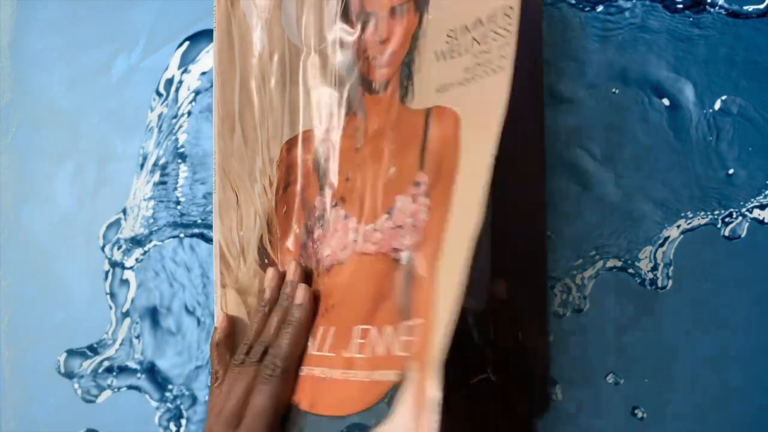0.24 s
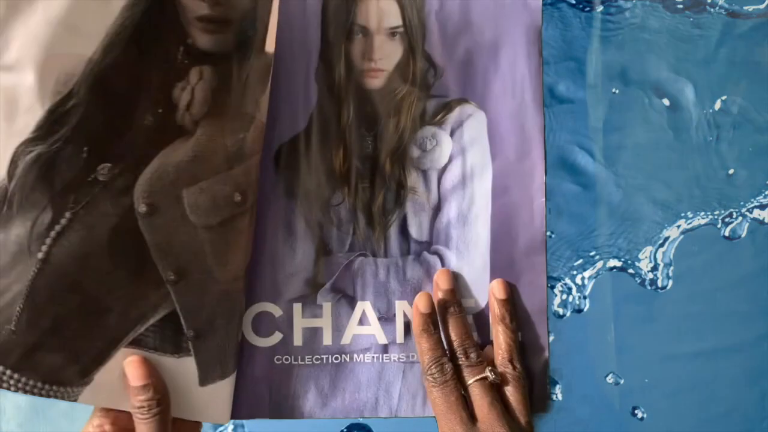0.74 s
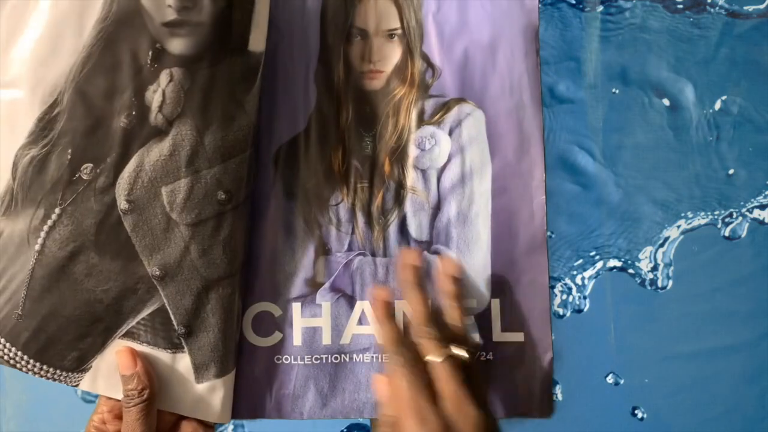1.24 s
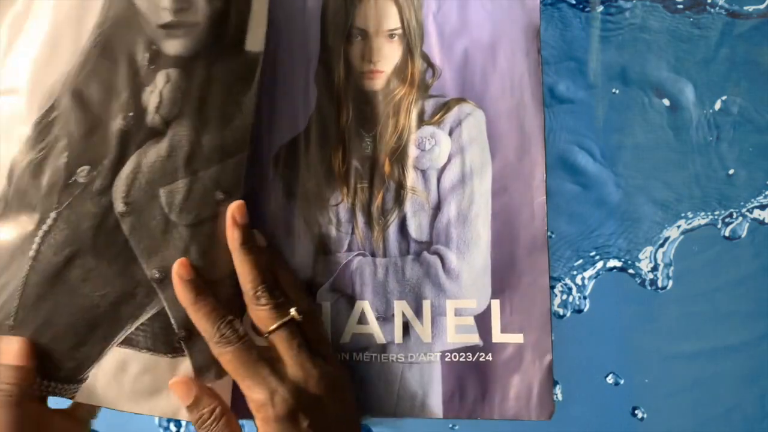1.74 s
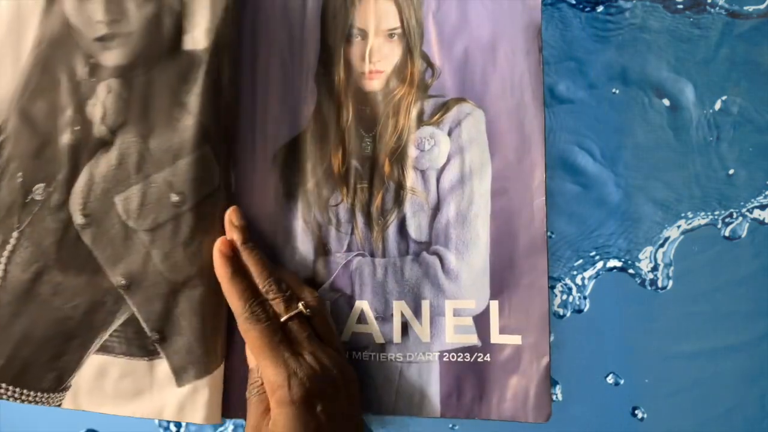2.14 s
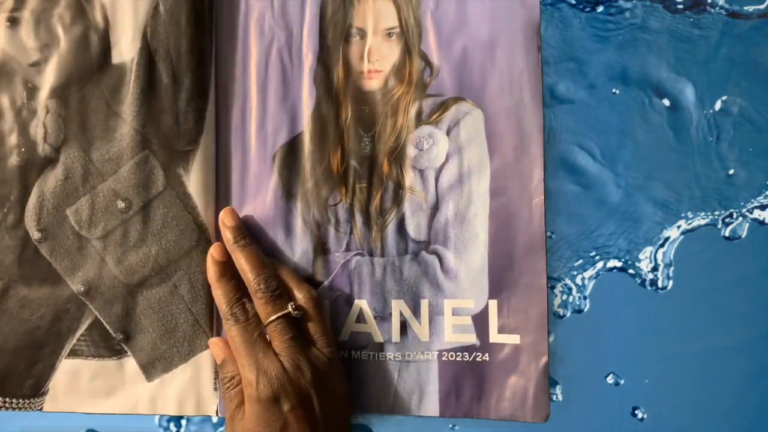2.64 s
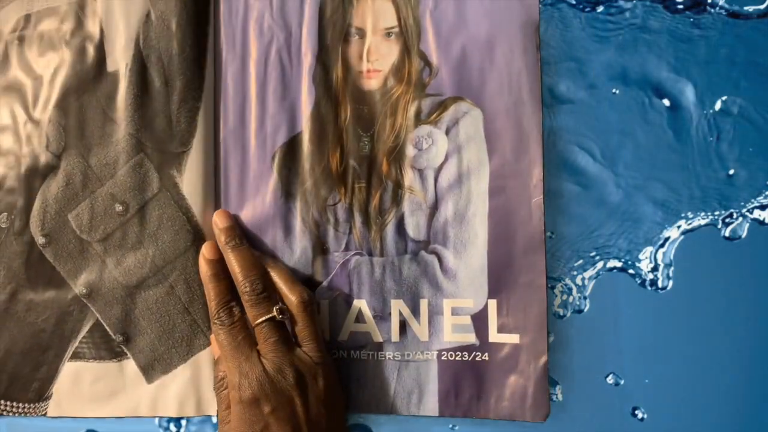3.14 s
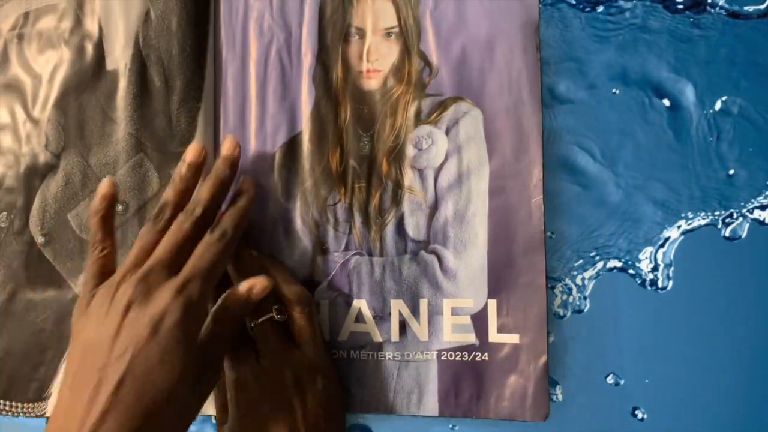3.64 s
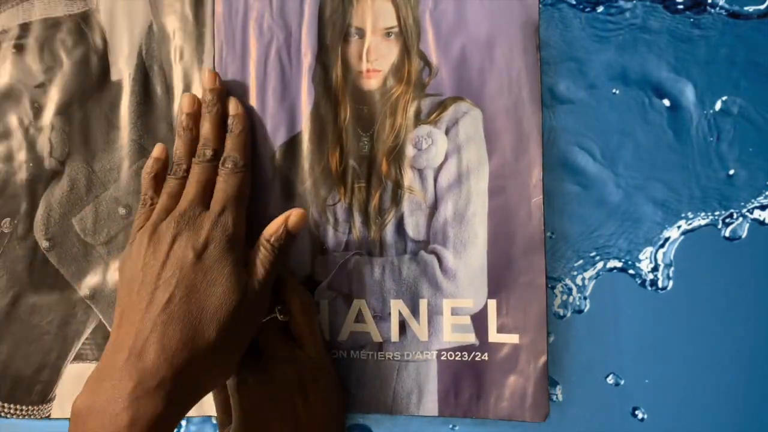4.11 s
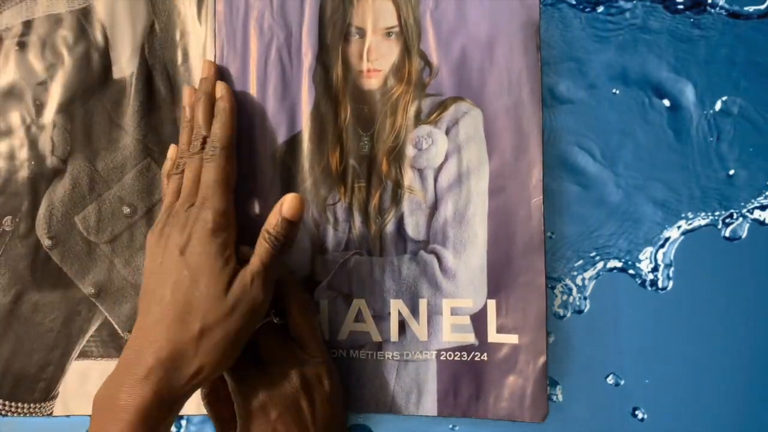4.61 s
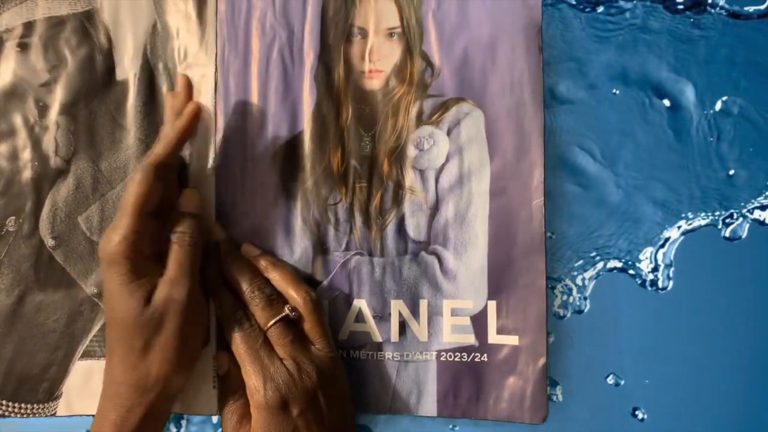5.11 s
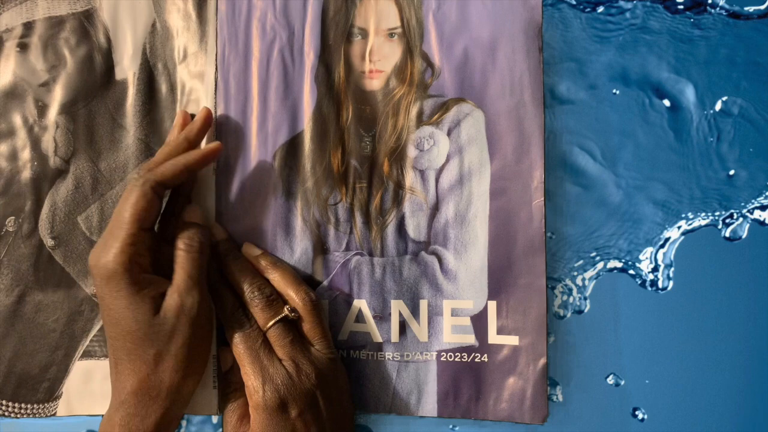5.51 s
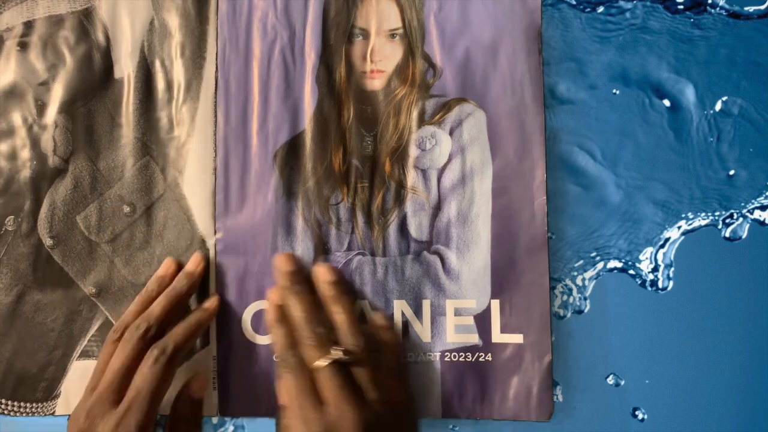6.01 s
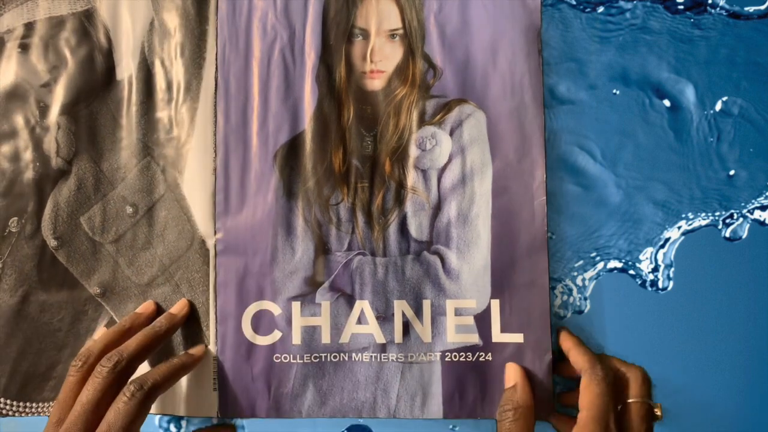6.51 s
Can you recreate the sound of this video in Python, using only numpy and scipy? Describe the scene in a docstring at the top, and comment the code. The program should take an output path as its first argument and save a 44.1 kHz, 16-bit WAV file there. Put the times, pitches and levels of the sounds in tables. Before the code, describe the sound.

Hands turn and flatten stiff glossy paper on a desk, heard very close in stereo. The opening has several bright snaps, then separated pops and fine sticky ticks, with faint brushing between them. Crackling bunches up past the middle, and a longer skin-on-paper hiss swells near the end with a few crinkles. Short room reflections surround it; a quiet bass hum throbs steadily underneath.

```python
"""A glossy magazine lies on a desk close to a phone. The cover opens with a bright snap; then hands press
and stroke the pages. Through the scene the stiff paper buckles, as noise-driven damped modes, with short snaps
and tiny ticks. Between them slides and brushes hiss over the gloss as shaped friction noise, the loudest
of them near the end. A small room answers with echoes and a decaying tail. From start to end appliances
behind the wall hum as a sum of tones that beat against each other, over a soft noise of air."""
import sys
import numpy as np
from scipy import signal
from scipy.fft import rfft, irfft, next_fast_len
from scipy.io import wavfile
from scipy.ndimage import uniform_filter1d, map_coordinates

SR = 44100
rng = np.random.default_rng(int(sys.argv[2]) if len(sys.argv) > 2 else 0)


def pcm_store(signal):
    """Save signal as 16-bit PCM."""
    levels = np.round(np.clip(np.atleast_2d(signal), -1, 1) * 32767)
    wavfile.write(sys.argv[1], SR, levels.astype(np.int16).T)


N = 298116  # length in samples

# Buckles of the sheet: t/s, approximate peak of the patch's ring level/dB, pitch f/Hz,
# crispness level/dB, weight level/dB, length/ms, left minus right level/dB
BUCKLES = [(0.003, -23, 1460, -1.5, -12.5, 4.2, -4), (0.077, -24.5, 955, -24, -16, 3.4, -2.5),
           (0.279, -25, 1340, -16.5, -8.5, 5.4, -2.5), (0.77, -22, 926, -25, -18, 2.55, 0),
           (0.782, -51, 1090, -32, -33, 2.3, 2), (1.063, -54, 2700, -15, -18, 3.3, -3),
           (1.111, -53, 1210, -25, -27, 7.5, -3), (1.213, -26, 1255, -36, -9, 3.5, -2),
           (1.54, -20, 1150, -11.5, -18.5, 5.4, -1), (1.636, -49.5, 960, -3, -5, 5.3, 1.5),
           (1.687, -41, 720, -15, -5.5, 7.2, -2), (1.805, -36, 640, -16, 1, 5.7, -4.5),
           (2.084, -18.5, 1280, -4, -28, 2.6, 0), (2.261, -37.5, 705, -22, 0.5, 8.4, -3.5),
           (2.28, -49.5, 780, -26, 8.5, 5.6, -2.5), (2.319, -39, 857, -42, -10, 8.7, -2),
           (2.627, -46, 755, -40, -3, 4.1, 1), (2.987, -50, 1260, -4, -28, 5.6, -5),
           (3.041, -35.5, 1070, -32, -17.5, 5.1, .5), (3.1, -35, 880, -22, -13, 7.5, -3),
           (3.137, -42.5, 1020, -24, 0.5, 8.7, -1.5), (3.647, -47.5, 1130, -30, -40, 12, 1),
           (4.06, -40, 750, -32, 5.5, 6, -3), (4.114, -28, 1500, 0.5, -14.5, 4.1, -1),
           (4.126, -32, 2400, -26, -33, 3.8, -7), (4.178, -25.5, 1350, -8.5, -19.5, 9.3, -6),
           (4.183, -23.5, 1200, -8, -3, 3.6, -3), (4.19, -28, 2160, -17, -11, 4.5, 4),
           (4.376, -47.5, 1550, -2, -12, 2.5, 0), (4.883, -18.5, 1530, -43, -17, 4.5, -3.5),
           (4.895, -23, 736, -5, -10.5, 3.9, 1), (4.931, -29, 1300, -16, -14.5, 4.2, -1.5),
           (5.356, -59, 1200, -23, -10, 5, -4), (5.958, -48.5, 1060, -10, 1, 8.1, -5),
           (6.139, -54.5, 2730, 11, -4.5, 9.6, -2), (6.177, -32, 1760, -16.5, -11, 10.3, -4),
           (6.187, -33, 860, -7, -21, 7.6, 2), (6.234, -30, 1350, -2.5, -10, 6.8, -2.5),
           (6.744, -43.5, 860, -29, -11, 4.4, -4)]
# Modes shaken along with the patch, two of crack and edge, then body and thump:
# centre f/Hz, width f/Hz, run of slips longer by this factor, level/dB before crispness or weight
SHEET_MODES = [(8100, 25000, 0.51, -15), (3890, 5060, 1.33, -0.64), (639, 580, 0.99, -1.7),
               (231, 700, 4.3, -8.5)]
JOLT, SOFTENS_DB = 2.32, 2  # jolt relative to the slips; raising the weight by this shrinks the jolt
PATCH_WIDTH_HZ, PATCH_WIDENS = 1440, 0.73  # ring width at 1.2 kHz; it grows as this power of the pitch
LEAD_IN = 400  # samples of soft onset before the jolt


def snaps():
    """Buckling instability: the bent patch rings at its own pitch and shakes the sheet and the pile below."""
    out = np.zeros((2, N + SR))
    for s, db, hz, crisp_db, weight_db, ms, pan_db in BUCKLES:
        noise = rng.standard_normal((5, SR // 10))
        jolt = JOLT * max(1 - amp(weight_db + SOFTENS_DB), 0)  # a heavy buckle lets go softly
        patch_width_hz = PATCH_WIDTH_HZ * (hz / 1200) ** PATCH_WIDENS
        sound = slips(noise[0], ms, hz, patch_width_hz, jolt)
        for row, (centre_hz, width_hz, longer, level_db) in zip(noise[1:], SHEET_MODES):
            # crack and edge grow with crispness, body and thump with weight
            shake_db = level_db + (crisp_db if centre_hz > 1000 else weight_db)
            sound = sound + amp(shake_db) * slips(row, longer * ms, centre_hz, width_hz, jolt)
        start = round((s + .0015) * SR)  # the jolt comes just after the soft onset begins
        pan = amp([[pan_db / 2], [-pan_db / 2]])
        out[:, start:][:, :len(sound)] += amp(db) * sound * pan
    return out[:, LEAD_IN:LEAD_IN + N]


def slips(noise, ms, centre_hz, width_hz, jolt):
    """Stick-slip excitation of a damped mode: soft onset, one jolt, slips that fall 20 dB in ms (at least 1)."""
    t = (np.arange(len(noise)) - LEAD_IN) / SR
    onset = amp(-13.5 + 20 * t / 0.0097)
    decay = amp(-20 * t / (max(ms, 1) / 1000))
    force = noise * np.where(t < 0, onset, decay)
    force[LEAD_IN:LEAD_IN + 4] += jolt * np.sign(noise[0])
    mode = resonance(centre_hz, width_hz)
    # the soft sheet rings one broad mode and passes little above it
    ring = filtered(force, lambda f: mode(f) ** 3 / (1 + 1j * f / (3.32 * centre_hz)) ** 4)
    ring_s = ms / 1000 + 1 / width_hz
    power = np.sum(ring ** 2) / (SR * ring_s)
    return ring / np.sqrt(power) * 0.44  # largest swing near 1


# A fingertip or the next page unsticks from the gloss: t/s, peak level/dB, pitch f/Hz
UNSTICKINGS = [(.0035, -23, 7470), (1.0035, -55, 13000), (1.065, -52, 7550), (1.1119, -54, 6980),
               (1.3986, -56, 6430), (1.67, -41, 7410), (1.9921, -56, 6580), (2.221, -40, 12560),
               (2.2408, -38.5, 7620), (2.2588, -45, 7160), (2.289, -51.5, 8550), (2.36, -54.5, 6660),
               (2.4933, -52, 12500), (2.5638, -53.5, 5930), (2.7958, -50, 7420), (2.825, -64, 11570),
               (2.889, -50, 13100), (3.033, -40.5, 7190), (3.055, -38.5, 7400), (3.119, -32, 6260),
               (3.1274, -30, 5960), (3.3878, -57.5, 13300), (4.1596, -45, 5100), (4.5221, -69, 12500),
               (5.105, -56.5, 6450), (5.1901, -53.5, 11900), (6.4872, -45.5, 12200)]
RISE_S, TICK_S = .0017, .0035  # time constant of the swell; time in which the decay falls 20 dB


def ticks():
    """Adhesive release: millisecond bursts through a broad treble resonance swell quickly and die."""
    out, t = np.zeros(N + SR), np.arange(SR // 50) / SR
    envelope = (1 - np.exp(-t / RISE_S)) * amp(-20 * t / TICK_S)
    for s, db, hz in UNSTICKINGS:
        burst = rng.standard_normal(len(t)) * envelope
        ring = filtered(burst, lambda f: resonance(hz, 1.8 * hz)(f) ** 2)
        out[round(s * SR):][:len(t)] += amp(db) * peak_one(ring)
    return np.array([out[:N], out[:N]])


# Spectral shapes of skin hiss, page rustle and dull drag: f/Hz, relative level/dB per Hz
SKIN_SHAPE = [(4000, -26.5), (7000, -3.5), (10000, -0.5), (13000, 1), (15700, -1)]
PAGE_SHAPE = [(2500, -42), (4000, 0.5), (5500, 0), (7000, -1), (9000, -10.5), (12000, -31)]
DRAG_SHAPE = [(600, -36.5), (1200, -12), (1700, -4.5), (2400, -10), (3800, -11), (6000, -28)]
PAGE_SHARE, PAGE_DB = .55, -1.5  # the rustle follows the hiss by this share, the drag by the rest


def stroke():
    """Sliding friction: skin on gloss gives a fine hiss, the page's rustle and a duller drag; pressure trembles."""
    skin_db, drag_db = contact()
    page_db = PAGE_DB + PAGE_SHARE * skin_db + (1 - PAGE_SHARE) * drag_db
    tremble = wobble(30)
    skin = amp(skin_db + 1.3 * tremble) * rush(SKIN_SHAPE, grain_db=1.0, patchy_db=-1.0)
    page = amp(page_db + 1.4 * tremble) * rush(PAGE_SHAPE, grain_db=1.5, patchy_db=1.5)
    drag = amp(drag_db + .6 * wobble(24)) * rush(DRAG_SHAPE, grain_db=2.5, patchy_db=1.6)
    return skin + page + drag


# Long slides of a hand, one curve each: t/s, skin hiss level/dB, drag level/dB
SLIDE_CURVES = [
    [(.3, -91, -89), (.45, -83.5, -78), (.56, -67, -69), (.68, -65.5, -70.5)],
    [(1.42, -70.5, -71.5), (1.58, -56.5, -68), (1.65, -54.5, -66), (1.73, -47.5, -58.5), (1.86, -63, -64),
     (1.92, -46.5, -55.5), (2.05, -69.5, -70), (2.16, -73.5, -63), (2.28, -63.5, -65.5), (2.36, -70.5, -78)],
    [(2.95, -79, -73), (3.03, -61.5, -68.5), (3.12, -47, -52), (3.17, -74, -75.5)],
    [(3.66, -56.5, -72.5), (3.71, -57.5, -73.5), (3.87, -62.5, -74), (4.07, -62, -64), (4.17, -56.5, -75)],
    [(4.62, -79.5, -64), (4.67, -61, -65), (4.72, -67, -64), (4.8, -61.5, -58), (4.83, -63, -77)],
    [(5.48, -56.5, -59.5), (5.59, -48.5, -59.5), (5.64, -50, -59), (5.69, -48.5, -55.5), (5.8, -55.5, -66),
     (5.97, -47.5, -63), (6.08, -43, -58), (6.19, -40, -67), (6.25, -50, -67), (6.36, -50, -64),
     (6.42, -61.5, -76.5)],
]
# Brief brushes of a finger: start t/s, length t/s, skin hiss level/dB, drag level/dB
FINGER_BRUSHES = [(0, 0.061, -62, -55), (1.018, 0.014, -71, -100), (1.107, 0.021, -73.5, -73),
                  (2.566, 0.015, -75, -73.5), (2.8, 0.0072, -89, -74.5), (2.9, 0.0043, -94, -88),
                  (4.354, 0.058, -73, -70), (4.879, 0.071, -71, -67.5), (5.194, 0.02, -70.5, -72),
                  (5.356, 0.0067, -73.5, -69), (6.481, 0.041, -60.5, -89), (6.583, 0.17, -76, -91)]
LAND_S, LIFT_S, FADE_DB = 0.036, 0.054, 25.5  # a contact fades by FADE_DB per LAND_S before, per LIFT_S after
REST_HISS_DB, REST_DRAG_DB = -83, -84.5  # hands lying still


def contact():
    """Contact envelopes: hiss and drag levels in dB as each slide or brush lands, runs its course and lifts."""
    t = np.arange(N) / SR
    gain = amp([[REST_HISS_DB], [REST_DRAG_DB]]) * np.ones(N)
    brushes = [[(s, *db), (s + length, *db)] for s, length, *db in FINGER_BRUSHES]
    for rows in SLIDE_CURVES + brushes:
        s, *levels = np.transpose(rows)
        before, after = np.maximum(s[0] - t, 0), np.maximum(t - s[-1], 0)
        away_db = FADE_DB * (before / LAND_S + after / LIFT_S)
        gain = gain + amp([np.interp(t, s, db) - away_db for db in levels])
    return 20 * np.log10(gain)


# The flat hand's scrape over time: t/s, level/dB
PALM_CURVE = [(0.0, -66), (0.7, -71), (0.88, -84.5), (1.34, -74), (1.75, -60.5), (2.2, -64), (2.33, -72.5),
              (3.07, -75), (3.3, -89.5), (3.62, -84), (3.66, -63), (3.8, -69.5), (4.0, -69), (4.2, -65.5),
              (4.59, -75.5), (4.89, -71), (5.361, -76.5), (5.67, -62.5), (5.93, -68), (6.3, -64.5),
              (6.48, -79.5), (6.76, -69.5)]
# Spectral shape of the scrape: f/Hz, relative level/dB per Hz
SCRAPE_SHAPE = [(350, -38), (650, -11.5), (950, -6.5), (1250, -4.5), (1550, -11), (2300, -28.5)]


def palm():
    """Broad-contact friction: the flat hand moving on the pile makes a warm narrow scrape."""
    s, db = np.transpose(PALM_CURVE)
    level_db = np.interp(np.arange(N) / SR, s, db) + 0.46 * wobble(15)
    return amp(level_db) * rush(SCRAPE_SHAPE, grain_db=2.5, patchy_db=3.5)


# Echoes off the desk and near surfaces: delay t/s, level/dB
REFLECTIONS = [(.0042, -17), (0.0108, -15.5), (.018, -36.5)]


def early_echoes(x):
    """Specular reflection: each near surface returns a delayed, weaker copy."""
    return sum(amp(db) * np.pad(x, ((0, 0), (round(s * SR), 0)))[:, :N] for s, db in REFLECTIONS)


# Reverberation time: f/Hz, time to fall 60 dB t/s
DECAY_TIMES = [(200, 0.43), (600, 0.13), (1500, 0.19), (4000, 0.22), (10000, .15)]


def room(x):
    """Diffuse reverberation: each frequency dies at its own speed; every half second gets a fresh tail."""
    out, step = np.zeros((2, N + 2 * SR)), SR // 2
    for start in range(0, N, step):
        shared, own = rng.standard_normal(step), rng.standard_normal((2, step))
        hz, t, z = signal.stft(shared + 1.8 * own, SR, nperseg=128)
        decay = amp(-60 * t / along(DECAY_TIMES, hz)[:, None])
        tail = signal.istft(z * decay, SR, nperseg=128)[1]
        wet = signal.fftconvolve(x[:, start:start + step], tail / np.linalg.norm(tail[0]), axes=1)
        out[:, start + 130:][:, :wet.shape[1]] += wet  # the tail begins 130 samples late
    return out[:, :N]


# Motor and mains tones: f/Hz, rms level/dB, moment in step with the first tone t/s
HUM_TONES = [(49.981, -55.7, 0), (49.075, -62.7, .4726), (58.284, -51, .0871), (66.97, -75, 0),
             (83.68, -63, 0), (119.88, -77, 0), (167.38, -77, 0), (174.89, -76, 0)]


def hum():
    """Beating: motor and mains tones close in pitch interfere, so the hum throbs about eight times a second."""
    t, first_hz = np.arange(N) / SR, HUM_TONES[0][0]
    tones = 0
    for hz, db, s in HUM_TONES:
        cycles = (hz - first_hz) * (t - s) + first_hz * t
        tones = tones + amp(db + 0.73 * wobble(3.7)) * np.cos(2 * np.pi * cycles)
    return np.sqrt(2) * tones


# Spectral shape of room air and microphone hiss: f/Hz, relative level/dB per Hz
AIR_SHAPE = [(25, -32.5), (45, 3.5), (70, -4.5), (110, -13.5), (150, -17.5), (180, -16), (240, -27.5),
             (480, -34.5), (750, -36), (1100, -36), (1900, -43), (3000, -55.5), (6000, -59.5),
             (15500, -58.5)]


def air():
    """Stationary background noise: room air and microphone hiss, strongest in the bass."""
    return amp(-57) * rush(AIR_SHAPE, grain_db=1.7, patchy_db=3.5)


# Likeness of the noise at both ports: f/Hz, correlation (1 = identical)
LIKENESS = [(60, 0.94), (200, 0.11), (600, 0.1), (1500, 0.44), (3000, 0.13), (5000, 0.92), (8000, 1),
            (15000, 1)]


def rush(spectrum, grain_db, patchy_db):
    """Partially coherent stereo noise of rms 1: grains of scattered size, time-frequency patches of random gain."""
    grains = rng.standard_normal((2, N)) * amp(grain_db * wobble(400))
    z = signal.stft(grains, nperseg=512)[2]
    field = uniform_filter1d(rng.standard_normal(z.shape[1:]), 3, 0)
    field = uniform_filter1d(field, 8, 1)
    pair = signal.istft(z * amp(patchy_db * unit(field)), nperseg=512)[1][:, :N]

    def mid_side(hz):
        """Coherence as an angle: the wider the turn, the less alike the ports."""
        turn = np.arccos(np.clip(along(LIKENESS, hz), -1, 1)) / 2
        return amp(along(spectrum, hz)) * [np.cos(turn), np.sin(turn)]

    mid, side = filtered(pair, mid_side)
    return unit(np.array([mid + side, mid - side]))


def resonance(centre_hz, width_hz):
    """Damped oscillator: causal response of one mode, gain 1 at its centre."""
    return lambda f: 1j * f * width_hz / (centre_hz ** 2 - f * f + 1j * f * width_hz)


def filtered(x, response):
    """Linear filtering: the spectrum of x times a complex response of frequency."""
    n = x.shape[-1]
    m = next_fast_len(n + 4096)
    return irfft(rfft(x, m) * response(np.fft.rfftfreq(m, 1 / SR)), m)[..., :n]


def wobble(rate):
    """Slow random modulation: a smooth curve with rate knots a second."""
    knots = rng.standard_normal(int(N * rate / SR) + 4)
    return map_coordinates(knots, [np.arange(N) * rate / SR])


def along(points, hz):
    """Logarithmic frequency scale: interpolates (f/Hz, value) points."""
    f, v = np.transpose(points)
    return np.interp(np.log(hz + 1), np.log(f + 1), v)


def amp(db):
    """Decibel law: level in dB to amplitude gain."""
    return 10 ** (np.asarray(db) / 20)


def unit(x):
    """Power normalisation: x at rms 1."""
    return x / np.sqrt(np.mean(x ** 2) + 1e-20)


def peak_one(x):
    """Peak normalisation: x with its largest swing at 1."""
    return x / np.max(np.abs(x))


def scene():
    """Superposition: paper close by, its echoes, the hands, the hum and the air."""
    paper = snaps() + ticks()
    early = early_echoes(paper)
    late = amp(-6.5) * room(paper.mean(axis=0, keepdims=True))
    return paper + early + late + stroke() + palm() + hum() + air()


# Level balance of the two ports: f/Hz, left minus right level/dB
PORT_BALANCE = [(60, -1), (300, -0.2), (1200, -0.5), (2400, -1.5), (4500, -0.5), (15000, 0.1)]
LEAD_FROM_HZ, LEAD_TURN_HZ = 2050, 5130  # above the first, the left port leads by one cycle per the second
TOP_HZ = 15700  # nothing passes from here up


def record(dry):
    """Spaced-port phase and level: treble leads at the left port, the right is a little louder lower down."""
    def left(hz):
        """Half the difference in level and phase; the right port gets the inverse."""
        lead = np.pi * np.maximum(hz - LEAD_FROM_HZ, 0) / LEAD_TURN_HZ
        return amp(along(PORT_BALANCE, hz) / 2) * np.exp(1j * lead)

    return filtered(dry, lambda hz: (hz < TOP_HZ) * np.array([left(hz), 1 / left(hz)]))


dry = scene()
out = record(dry)
pcm_store(out)
```